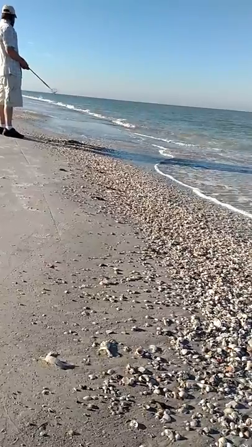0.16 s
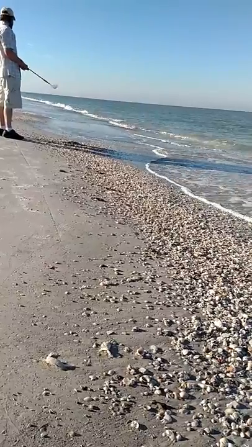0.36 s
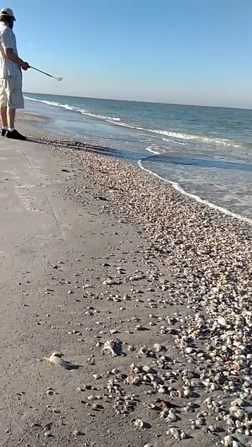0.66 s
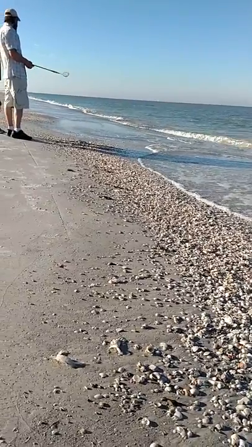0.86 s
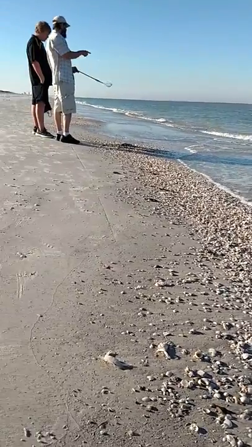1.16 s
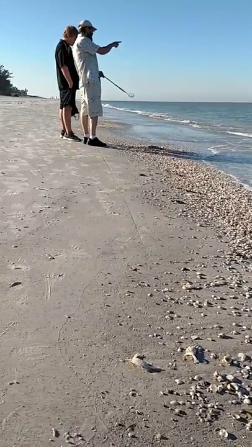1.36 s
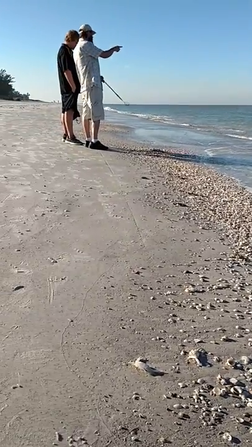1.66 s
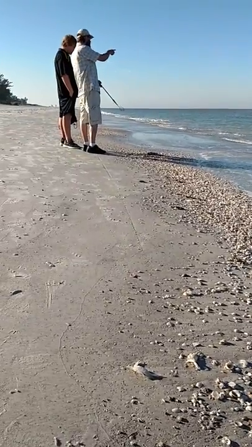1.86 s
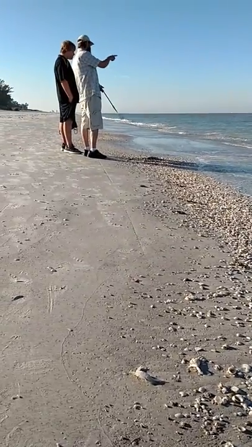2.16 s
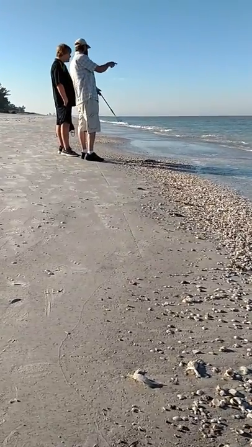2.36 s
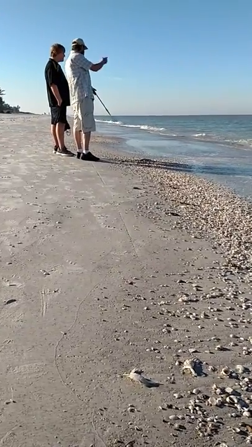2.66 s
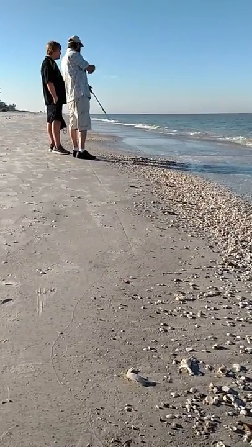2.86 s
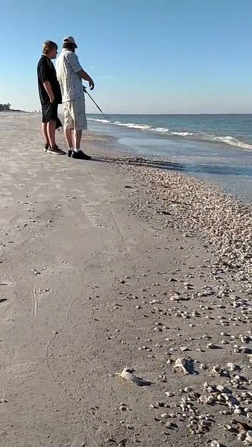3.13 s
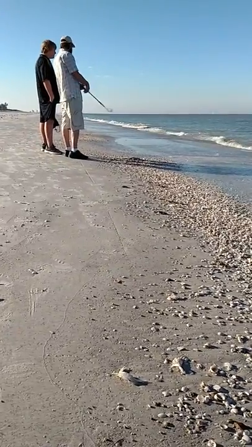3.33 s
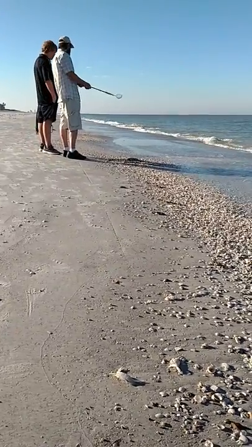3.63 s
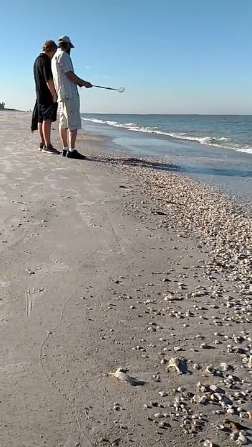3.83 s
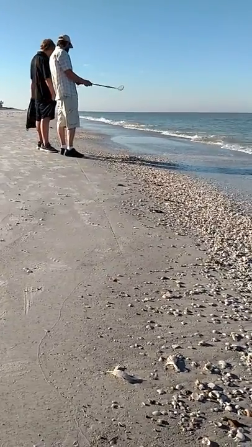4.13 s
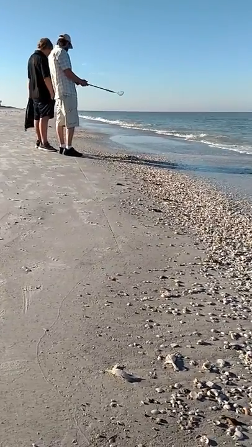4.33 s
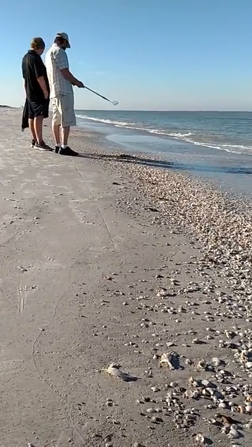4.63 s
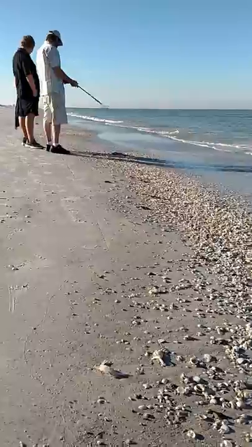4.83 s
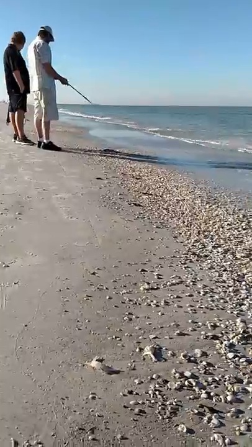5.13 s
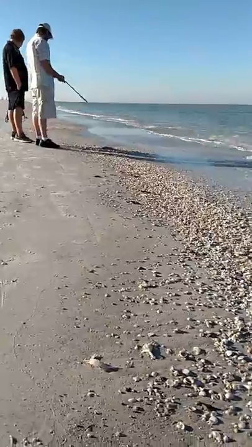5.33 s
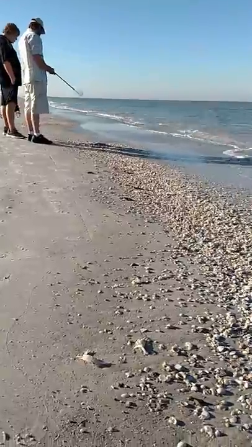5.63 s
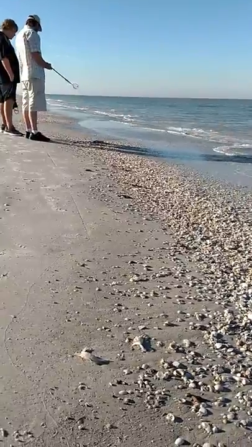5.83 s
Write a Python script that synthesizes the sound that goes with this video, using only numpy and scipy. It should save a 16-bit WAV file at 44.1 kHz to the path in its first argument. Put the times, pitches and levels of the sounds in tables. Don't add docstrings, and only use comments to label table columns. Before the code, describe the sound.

Low wind buffeting and surf on a shell beach: a near wave crashes and runs up, another follows, then small bubbles plink.

```python
import sys
import numpy as np
from scipy import signal
from scipy.fft import rfft, irfft, next_fast_len
from scipy.io import wavfile

SR = 44100
rng = np.random.default_rng(int(sys.argv[2]) if len(sys.argv) > 2 else 0)


def wrap_up_sound(samples):
    columns = np.atleast_2d(samples).T
    tamed = np.clip(columns, -1, 1)
    steps = np.round(tamed * 32767).astype(np.int16)
    wavfile.write(sys.argv[1], SR, steps)


def linear_from_db(decibels):
    return 10 ** (np.asarray(decibels, float) / 20)


N = 264159

# t/s, rumble level/dB, deepness/dB per octave
WIND = [(0.0, -40.5, -7), (0.35, -39.5, 2), (0.95, -41.5, -2), (1.08, -33, 0.5), (1.2, -29, 2.5),
        (1.28, -31, -2.5), (1.73, -32, -6.5), (2.1, -33.5, -3), (2.3, -38.5, 1), (2.45, -46.5, 6),
        (2.7, -35, 1), (2.82, -36, 0.5), (3.4, -37.5, -2.5), (3.69, -39.5, -2.5), (4.17, -36.5, 2),
        (4.64, -39.5, 4.5), (5.99, -39, 3)]
# f/Hz, level/dB per Hz
WIND_COLOUR = [(8.8, -38), (15, -6.5), (33, -7), (91, 1), (260, -5.5), (340, -34), (570, -120)]
# t/s, peak level/dB, rise/ms, recovery f/Hz
PUSHES = [(.2046, -21, 7.8, 70), (.2112, -18.3, 1.2, 92), (.2395, -18.4, 6.7, 90), (.3883, -19.9, 1.1, 78),
          (.4726, -18.3, 2.2, 70), (.63, -18.2, 1.7, 80), (1.0746, -20, 4.1, 170),
          (1.0859, -15.3, 1.2, 100), (1.1978, -12.6, 4.5, 144), (1.7544, -14.3, 4.4, 160),
          (4.6278, -24.5, 7.4, 52), (4.7549, -24.6, 5.9, 160), (4.7777, -25.0, 2.6, 154),
          (4.9534, -23, 4.6, 70), (5.0864, -24, 3.2, 125), (5.1279, -28, 2.7, 110),
          (5.5389, -19.1, 3.6, 84), (5.5799, -17.3, 3.5, 100), (5.9855, -23, 5, 55)]
# t/s, peak level/dB, rise/ms, recovery f/Hz
SUCKS = [(-.004, -25, 4, 62), (.6147, -21.0, .9, 100), (.7141, -21, 6.4, 113), (1.0305, -20.6, 1.3, 160),
         (1.0974, -19, 2.5, 70), (1.1883, -2.2, .8, 132), (1.1966, -15.8, 2.8, 58), (1.3259, -6.9, .7, 137),
         (1.6982, -15.5, 2.3, 165), (1.8331, -15, 3.5, 130), (2.2419, -18.5, 1.1, 140),
         (2.8806, -19.2, 2.6, 68), (4.08, -25.7, 3.9, 152), (4.3942, -22.4, 3.5, 36),
         (4.5507, -17.4, 5.9, 92), (4.7399, -27, 7.4, 60), (4.7358, -16.7, 2.9, 146),
         (4.8962, -23.0, 5.4, 168), (4.9864, -23.5, 4.5, 80), (5.5626, -19.7, 16.5, 128)]

SURF_HZ = [350, 1400, 3800, 8500]
# f/Hz, level/dB per Hz
SURF_COLOUR = [(190, -51.5), (380, -48.5), (520, -56), (800, -58.5), (1300, -64), (2100, -72), (2500, -79),
               (3200, -83.5), (4200, -87.5), (5600, -93.5), (7500, -95.5), (9500, -104), (12000, -112),
               (15500, -119)]
# f/Hz, width/Hz, depth (+ cancels, - reinforces)
LOW_DIPS = [(481, 233, 0.5), (1135, 208, 1), (1360, 140, -0.48), (1778, 460, 0.59)]
# f/Hz, width/Hz, depth
MID_DIPS = [(2720, 350, .5), (3130, 260, -1.2), (3520, 400, .75), (4230, 280, -1.0)]
# f/Hz, width/Hz, depth
HIGH_DIPS = [(4650, 330, .75), (5020, 300, -1.1), (5850, 400, .45), (8100, 500, -.6), (8850, 350, -.9)]

# t/s, level/dB, rise/s, fall/s
FAR_WAVES = [
    (.5, -13.5, 5.0, 3.3),
    (2.84, -10, 0.096, 0.06),
    (3.25, -4, 0.99, 1.02),
    (3.58, -9.5, 0.05, .06),
    (5.6, -13.5, 0.74, 0.26),
    (6.1, -9.5, 0.72, .3),
]
# t/s, level/dB, rise/s, fall/s
CURLS = [
    (.87, -10.5, 0.23, .06),
    (1.14, -0.9, 0.29, 0.092),
]
# t/s, level/dB, rise/s, fall/s
SPLASHES = [
    (1.015, -5.5, .06, .1),
    (1.66, -14, 0.16, 0.13),
    (2.75, -18, 0.23, 0.21),
    (3.19, -13.5, .04, 0.025),
    (5.47, -25, .05, .1),
]
# t/s, level/dB, rise/s, fall/s
ROARS = [
    (1.39, -2.5, .36, 0.97),
    (1.73, 1.0, 0.37, 0.71),
    (2.12, -6.5, 0.22, 0.43),
    (5.15, -21.5, 0.33, 0.36),
]
# t/s, level/dB, rise/s, fall/s
BOOMS = [
    (1.39, 2.5, 0.13, 0.18),
    (1.78, -2.5, .08, 0.09),
    (2.12, -4.5, 0.088, 0.063),
    (3.22, -8.0, 0.069, 0.052),
    (3.5, -5, 0.11, 0.12),
    (5.44, -13.5, 0.051, .1),
]
# t/s, peak level/dB, f/Hz
PLINKS = [
    (4.93, -49, 1630),
    (5.151, -37, 1800),
    (5.186, -48, 1790),
    (5.212, -48, 2050),
    (5.328, -57, 4230),
    (5.355, -59, 4250),
    (5.41, -59, 5600),
    (5.61, -58, 4200),
    (5.746, -32, 1410),
    (5.848, -33, 1450),
]

# (boom, wash, fizz, spray) level/dB; the open sea never stops
CURL_PARTS, ROAR_PARTS = (-12, 0.9, -1.5, 0), (-0.58, -0.45, -.2, 0.45)
BOOM_PARTS, SPLASH_PARTS = (-0.6, -21, -28, -30), (-17, -3.5, 1, 10)
FAR_PARTS, SEA_PARTS = (-2.06, 1.23, -1.7, -6.5), (-16.5, -22.5, -21, -20)
# (wash level/dB at onset, span to full/dB, least share 0-1)
MID_ONSET, HIGH_ONSET = (-11.5, 11.4, 0.23), (-6, 4.4, .02)


def rms_one(x):
    return x / np.sqrt(np.mean(x ** 2) + 1e-20)


def in_time(rows):
    s, *columns = np.transpose(rows)
    return [np.interp(np.arange(N) / SR, s, c) for c in columns]


def at_hz(points, hz):
    f, level_db = np.transpose(points)
    return np.interp(np.log(hz), np.log(f), level_db)


def drift(rate_hz):
    r = np.exp(-2 * np.pi * rate_hz * 40 / SR)
    noise = rng.standard_normal(N // 40 + 2002)
    slow = signal.lfilter([1], [1, -2 * r, r * r], noise)[2000:]
    return np.interp(np.arange(N) / 40, np.arange(len(slow)), rms_one(slow))


def bands(sources, low_hz, count):
    edges = low_hz * 2 ** (np.arange(count + 1) / 3)
    for k, (low, high) in enumerate(zip(edges, edges[1:])):
        source = sources[k % 2]
        sos = signal.butter(2, [low, high], "band", fs=SR, output="sos")
        run_in = np.r_[source[-9000:], source]
        yield np.sqrt(low * high), signal.sosfilt(sos, run_in)[9000:]


def thumps():
    span = 2400
    out = np.zeros(N + 2 * span)
    jumps = [(1, *row) for row in PUSHES] + [(-1, *row) for row in SUCKS]
    port = signal.butter(3, 1250, fs=SR)
    for sign, s, peak_db, rise_ms, recover_hz in jumps:
        step = np.clip(np.arange(span) / (rise_ms * SR / 1000), 0, 1) ** 2
        w = 2 * np.pi * recover_hz / SR
        q = max((recover_hz / 98) ** 1.5, .5)
        damp, cos = np.sin(w) / (2 * q), np.cos(w)
        low_cut = [1, -2, 1, 1 + damp, -2 * cos, 1 - damp]
        swing = signal.sosfilt(np.array([low_cut, low_cut]) / (1 + damp), step)
        swing = signal.lfilter(*port, swing)
        at = span + int(s * SR)
        out[at:at + span] += sign * linear_from_db(peak_db) * swing / abs(swing).max()
    return out[span:span + N]


def wind(lumpy_db=1.0, own_db=1.0):
    rumble_db, deep_db = in_time(WIND)
    out, lumps = 0, drift(15)
    for hz, band in bands(rng.standard_normal((2, N)), 14.43, count=13):
        tilt_db = deep_db * np.log2(100 / hz)
        flicker_db = lumpy_db * lumps + own_db * drift(13.0)
        out = out + linear_from_db(at_hz(WIND_COLOUR, hz) + tilt_db + flicker_db) * band
    return linear_from_db(rumble_db + 2.5) * rms_one(out)


def surges(rows, parts_db):
    t, power = np.arange(N) / SR, 0
    for s, level_db, rise_s, fall_s in rows:
        away = np.where(t < s, (s - t) / rise_s, (t - s) / fall_s)
        power = power + linear_from_db(level_db - 10 * away ** 1.5) ** 2
    return linear_from_db(np.array(parts_db))[:, None] ** 2 * power


def swell():
    far = surges(FAR_WAVES, FAR_PARTS)
    sea = linear_from_db(np.array(SEA_PARTS))[:, None] ** 2
    near = surges(CURLS, CURL_PARTS) + surges(ROARS, ROAR_PARTS) + surges(SPLASHES, SPLASH_PARTS)
    water = near + far + sea
    along = 1 - near[1] / water[1]
    far_db = 10 * np.log10(far[1] + 1e-9)
    shares = [along]
    for start_db, span_db, least in (MID_ONSET, HIGH_ONSET):
        loudness = np.clip((far_db - start_db) / span_db, 0, 1)
        shares.append(np.clip(along * loudness, least, 1))
    return 10 * np.log10(water + surges(BOOMS, BOOM_PARTS)), shares


def collapses(per_s, spread_db):
    sizes = linear_from_db(spread_db * np.minimum(rng.exponential(1, (2, N)), 5))
    signed = sizes * rng.choice([-1, 1], (2, N))
    return rms_one(signed * (rng.random((2, N)) < per_s / SR))


def bubbles(per_s=260.0, cycles=24.0, spread_db=3.5):
    sizes = linear_from_db(spread_db * np.minimum(rng.exponential(1, N), 4))
    sizes = sizes * (rng.random(N) < per_s / SR)
    pitches, dealt, out = np.geomspace(450, 9000, 30), rng.integers(0, 30, N), 0
    for k, hz in enumerate(pitches):
        r, w = linear_from_db(-60 * hz / (cycles * SR)), 2 * np.pi * hz / SR
        struck = sizes * (dealt == k) + 1e-18
        ringing = signal.lfilter([0, np.sin(w)], [1, -2 * r * np.cos(w), r * r], struck)
        out = out + hz * ringing
    return rms_one(out)


def colour(x, spectrum):
    size = next_fast_len(N)
    hz = np.arange(size // 2 + 1) * SR / size + 1
    return np.sqrt(SR / 2) * irfft(rfft(x, size) * linear_from_db(at_hz(spectrum, hz)), size)[:N]


def dips(x, table, share):
    for hz, width_hz, depth in table:
        cancelled = np.clip(share * depth, -1.2, .75)
        x = x - cancelled * signal.lfilter(*signal.iirpeak(hz, hz / width_hz, SR), x)
    return x


def surf(grain_share=0.3, bubble_db=-9, together_db=0.16, own_db=0.93):
    swell_db, shares = swell()
    blur = np.sqrt(1 - grain_share) * rng.standard_normal((2, N))
    grains = np.sqrt(grain_share) * collapses(3000, spread_db=4.0)
    cloud = blur + grains + linear_from_db(bubble_db) * bubbles()
    out, slosh = 0, drift(23.0)
    for hz, band in bands(cloud, 141.2, count=21):
        place = np.interp(np.log(hz), np.log(SURF_HZ), np.arange(4))
        weights = np.clip(1 - abs(place - np.arange(4)), 0, 1)
        flicker_db = together_db * slosh * np.clip(hz / 5000, .3, 1.5) + own_db * drift(11.8)
        out = out + linear_from_db(weights @ swell_db + flicker_db) * band
    out = colour(out, SURF_COLOUR)
    for table, along in zip((LOW_DIPS, MID_DIPS, HIGH_DIPS), shares):
        out = dips(out, table, along)
    return out


def plinks(cycles=16.0, climb=.04):
    out = np.zeros(N)
    for s, peak_db, hz in PLINKS:
        turns = np.arange(int(.03 * SR)) * hz / SR
        shape = (1 - np.exp(-turns / 1.3)) * linear_from_db(-26 * turns / cycles)
        ringing = shape * np.sin(2 * np.pi * turns * (1 + climb * turns / cycles))
        start = int(s * SR)
        out[start:start + len(turns)] += linear_from_db(peak_db) * ringing
    return out


def scene():
    return (thumps() + wind() + surf() + plinks())[None]


def band_limit(x):
    return signal.sosfilt(signal.butter(12, 15500, fs=SR, output="sos"), x)


def record(dry):
    hiss = signal.lfilter(*signal.butter(1, 8000, fs=SR), rng.standard_normal(dry.shape))
    return band_limit(dry + linear_from_db(-68) * hiss)


dry = scene()
out = record(dry)
wrap_up_sound(out)
```